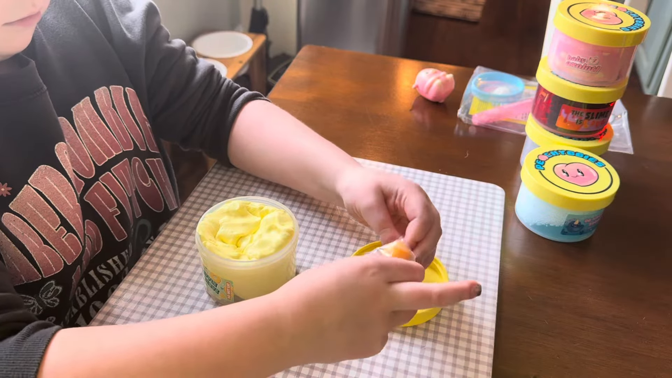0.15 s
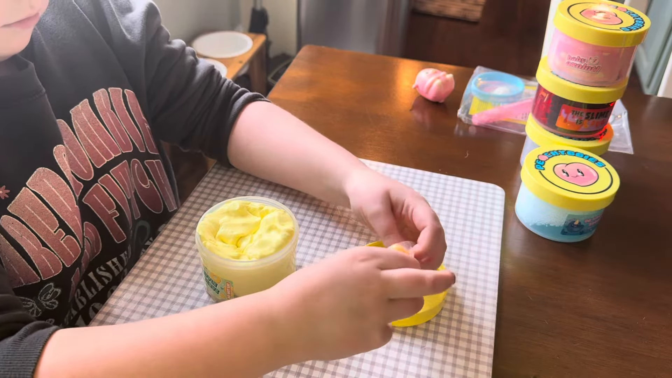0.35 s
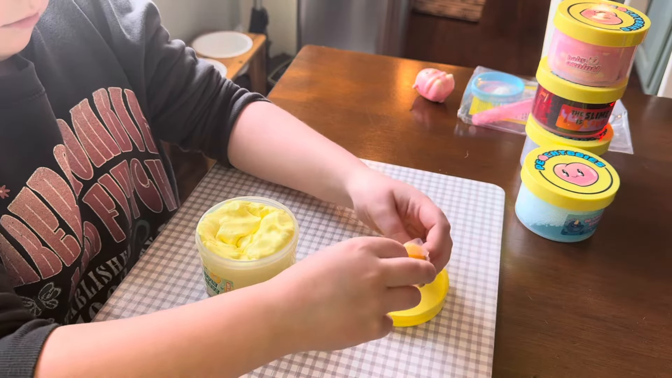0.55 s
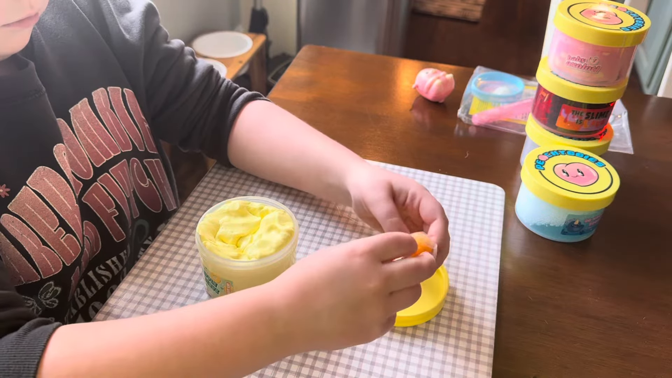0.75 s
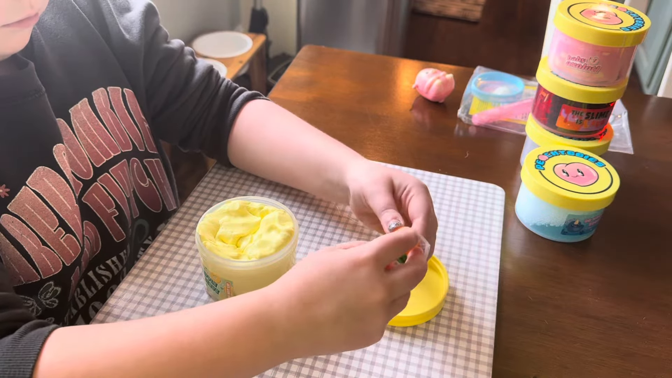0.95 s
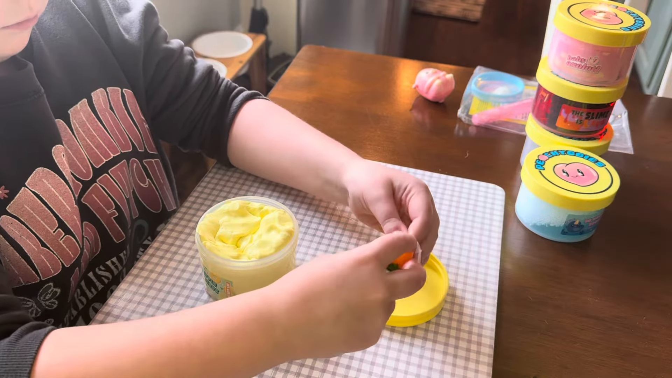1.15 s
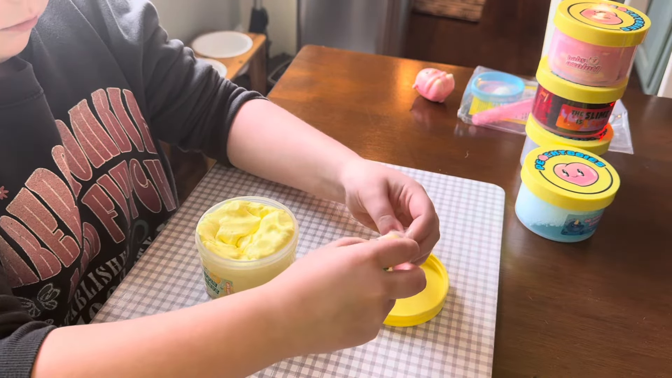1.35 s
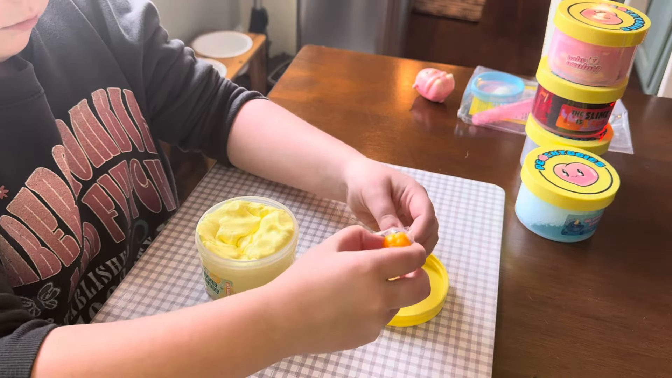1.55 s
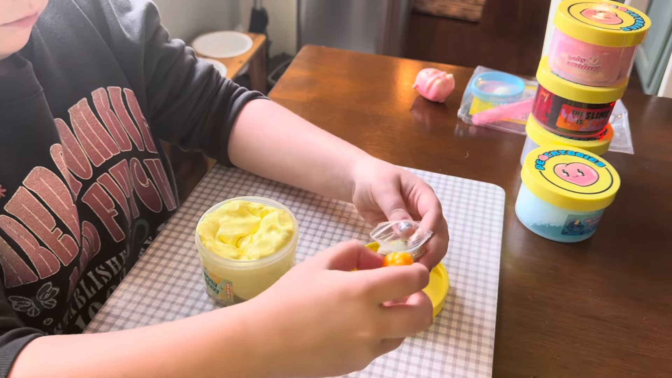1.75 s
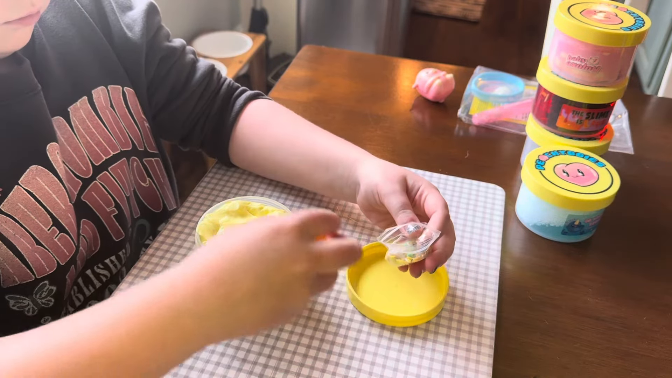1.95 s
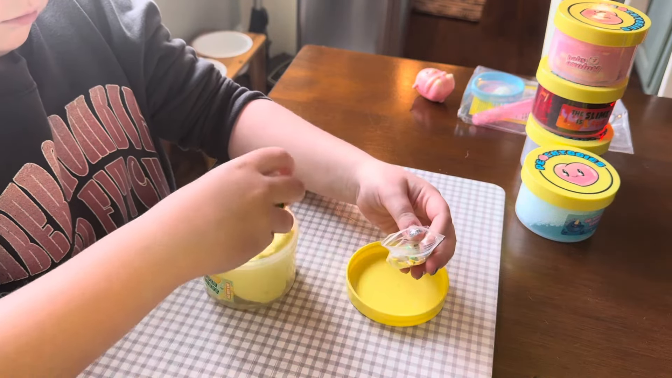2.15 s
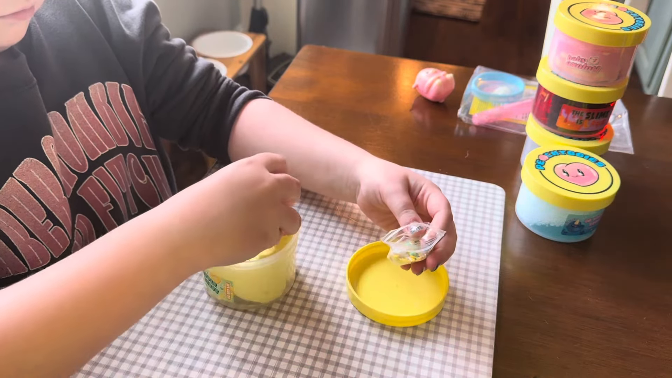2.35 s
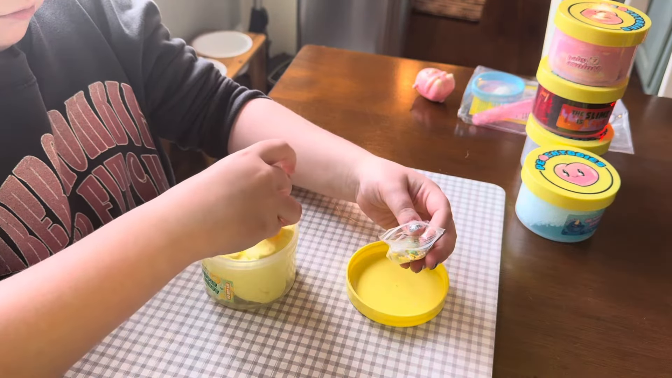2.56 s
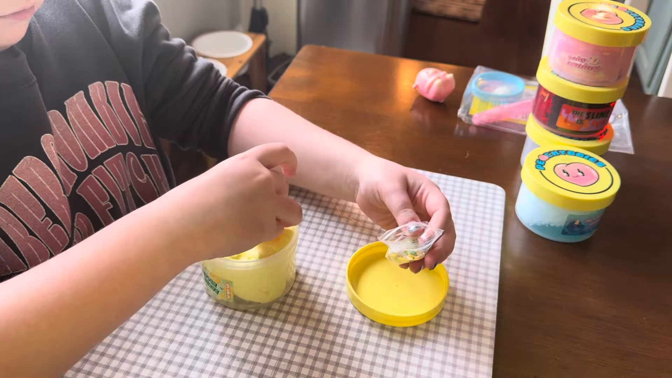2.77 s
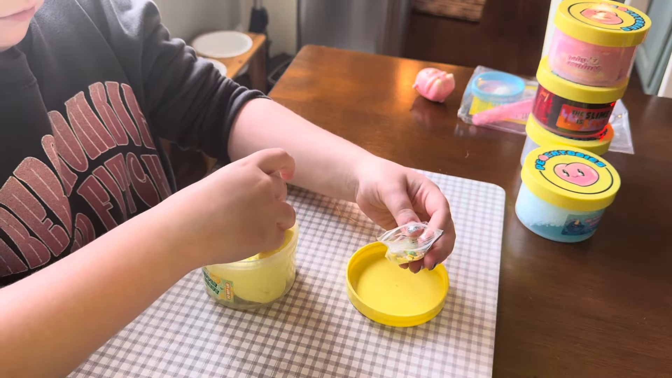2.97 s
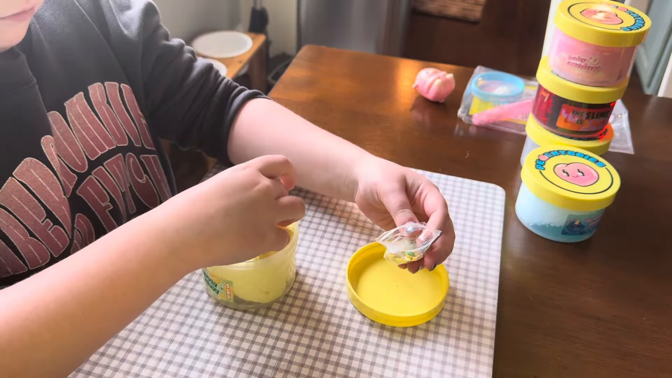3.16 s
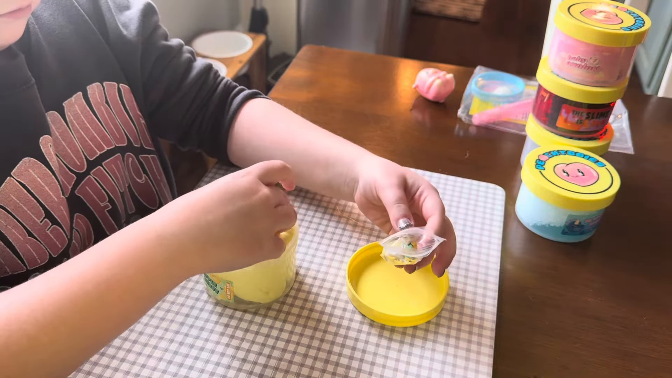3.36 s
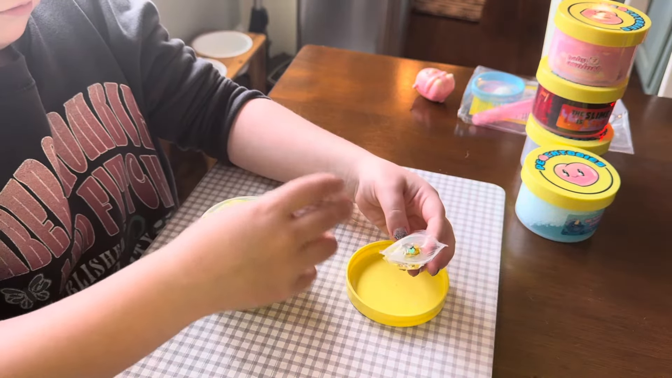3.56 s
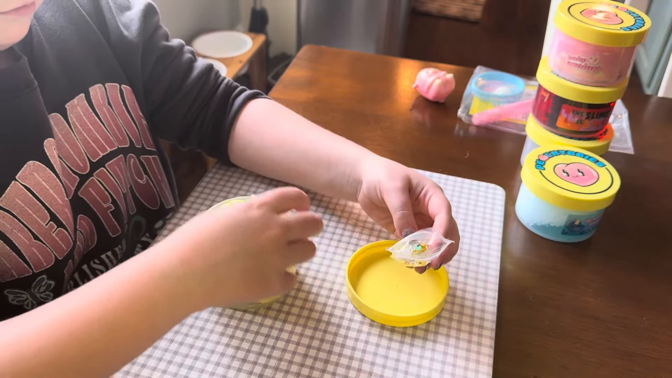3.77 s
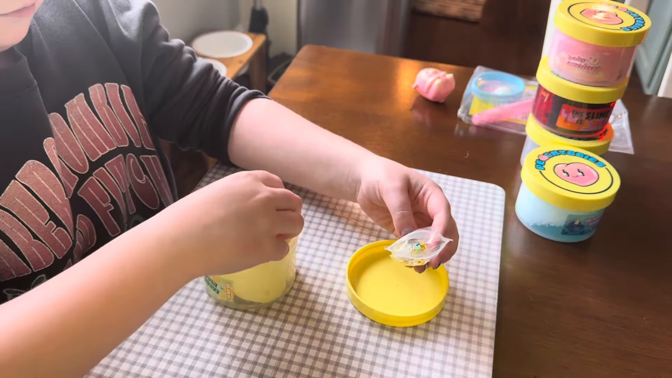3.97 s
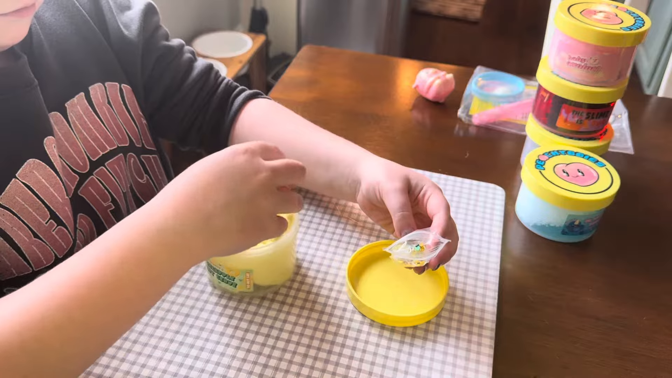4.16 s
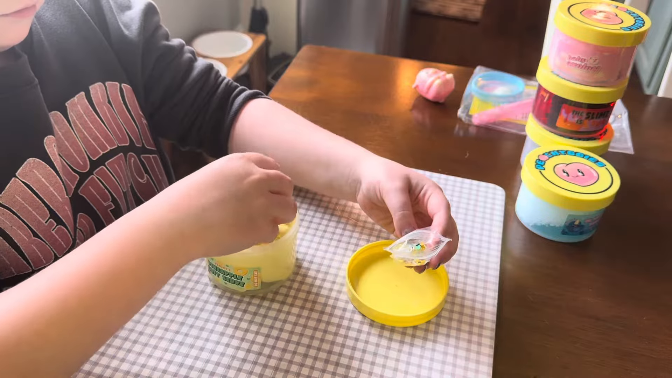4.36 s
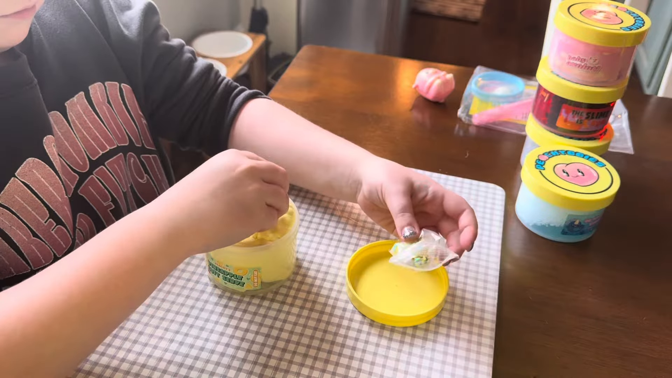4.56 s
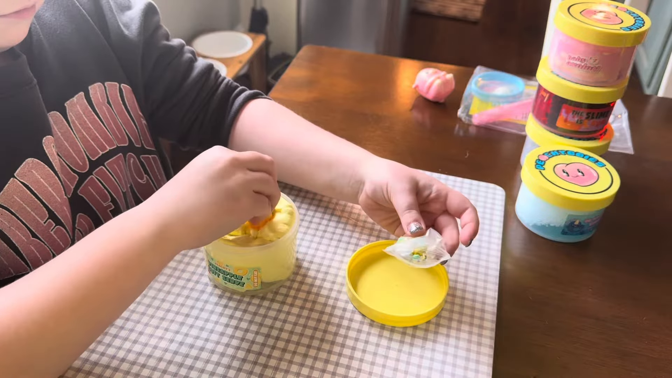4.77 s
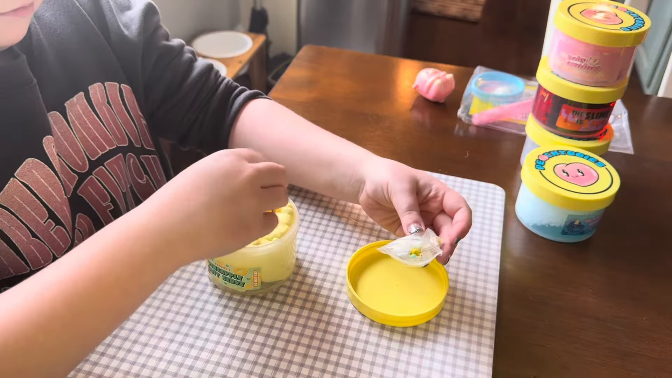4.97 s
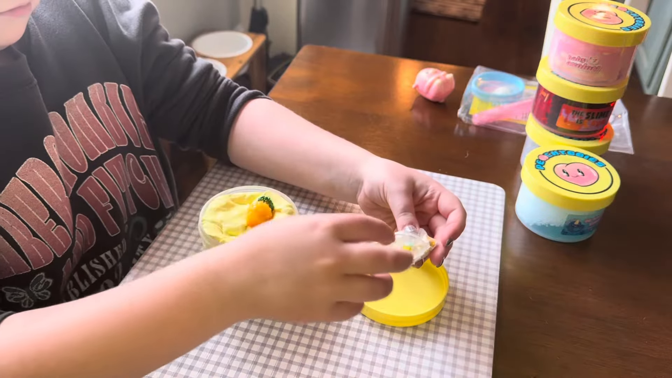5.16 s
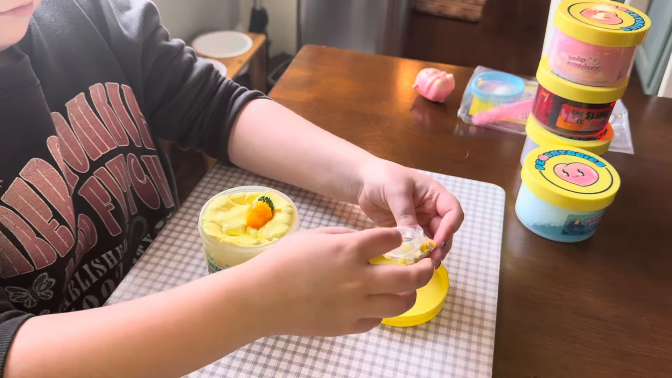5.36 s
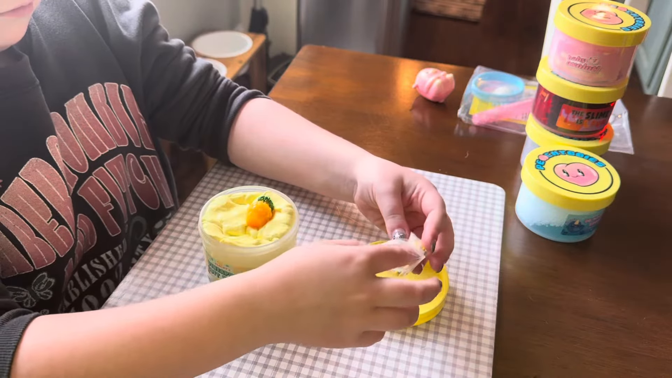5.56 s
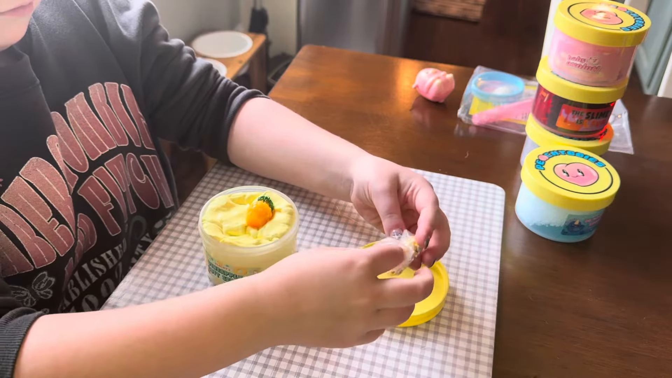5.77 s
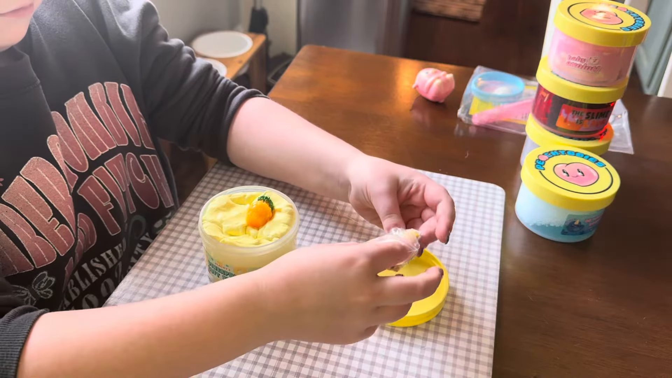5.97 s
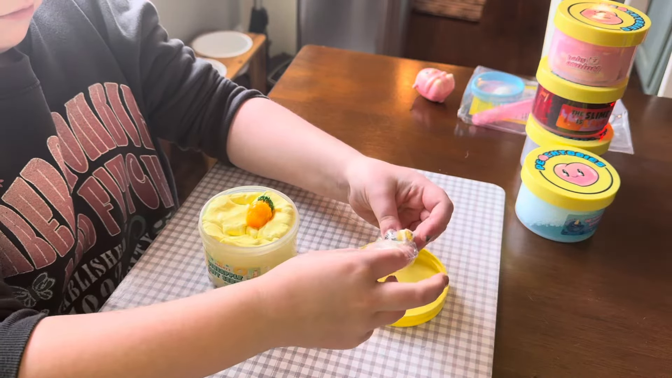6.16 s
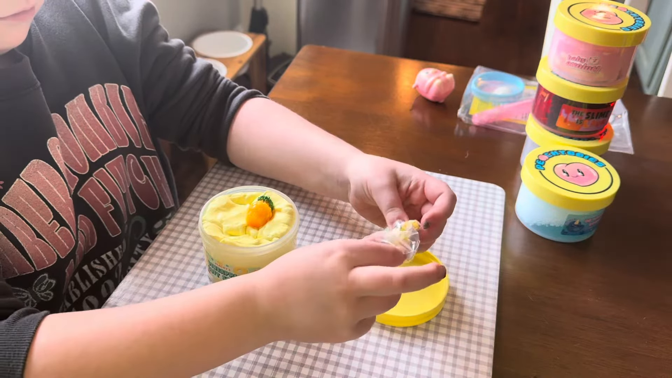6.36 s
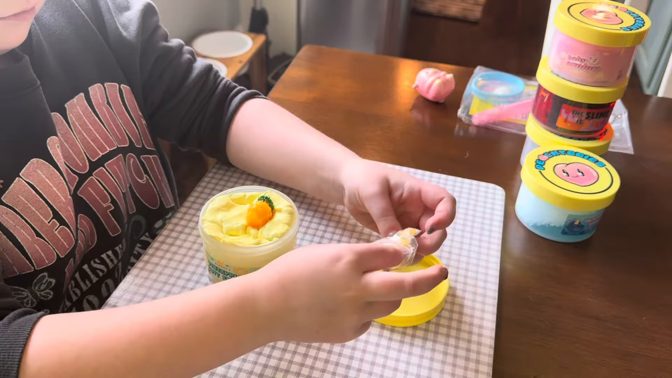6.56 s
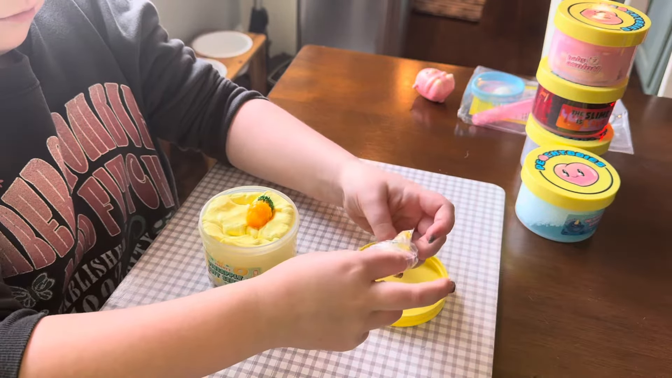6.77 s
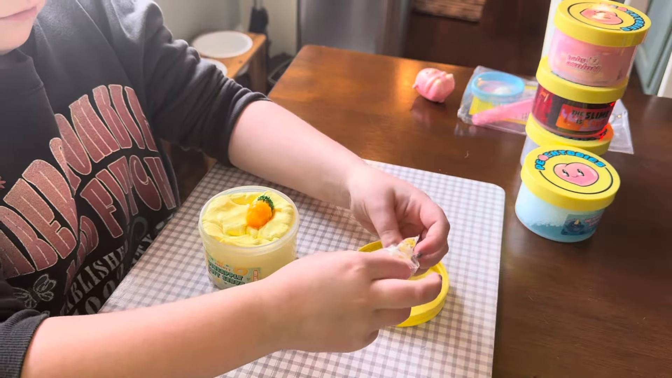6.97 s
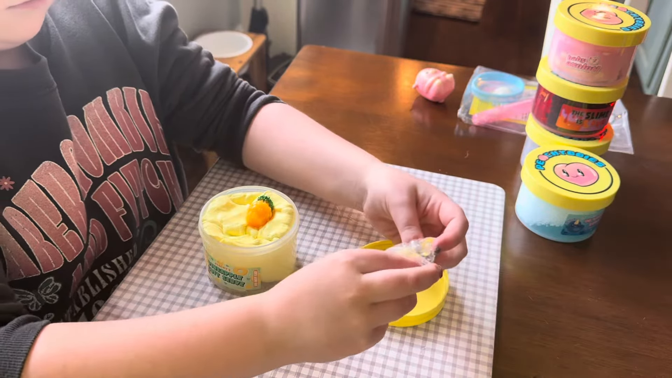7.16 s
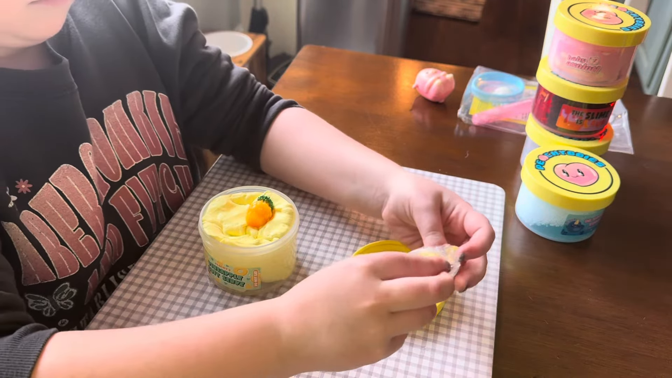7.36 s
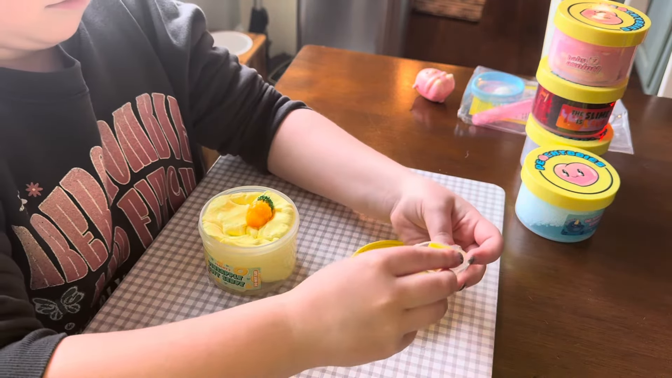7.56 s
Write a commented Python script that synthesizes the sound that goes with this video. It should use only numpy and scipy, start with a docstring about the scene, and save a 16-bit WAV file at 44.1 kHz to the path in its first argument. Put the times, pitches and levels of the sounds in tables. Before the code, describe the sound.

Small crisp plastic snaps and rustles in a lively room, dull floor thumps, a faint wet squish, a hollow tub clatter, then more crinkling.

```python
"""Charm, crinkly bag and slime tub

At a wooden table, fingers work a small charm out of a plastic bag, press it into a tub of slime and go back.
The film snaps (cracks and short rings), rustles (trains of tiny slips) and squeaks once (a falling chirp).
The slime squishes in dull pops; once the tub knocks on the table and rattles to rest (bursts and ringing modes).
Dull thumps, most like steps on a wooden floor, one the table's boom (low sines, dying noise), fill a lively room.
Beneath lie shaped room noise and a faint appliance hum (wavering sines)."""
import sys
import numpy as np
from scipy import signal
from scipy.fft import rfft, irfft
from scipy.io import wavfile
from scipy.ndimage import uniform_filter1d

SR = 44100
rng = np.random.default_rng(int(sys.argv[2]) if len(sys.argv) > 2 else 0)


def file_out(sig):
    """Save sig as 16-bit WAV at sys.argv[1]."""
    # one column per channel
    cols = np.atleast_2d(sig).T
    # limit, then scale
    lim = np.clip(cols, -1, 1)
    pcm = np.round(lim * 32767).astype(np.int16)
    wavfile.write(sys.argv[1], SR, pcm)


N = 336042


def gain_of(db):
    """Decibels to amplitude."""
    return 10 ** (np.asarray(db) / 20)


def evened(x):
    """Scales to rms 1."""
    return x / np.sqrt(np.mean(x ** 2) + 1e-20)


def sized(x, seconds):
    """Gives a sound the energy of rms 1 held for so many seconds."""
    return evened(x) * np.sqrt(seconds * SR / x.shape[1])


def read(points, hz):
    """Reads a table of (frequency [Hz], value) on a log-frequency axis."""
    f, value = np.transpose(points)
    return np.interp(np.log(hz + 1), np.log(f + 1), value)


def add(mix, s, sound):
    """Mixes a stereo sound in at time s."""
    part = mix[:, max(round(s * SR), 0):][:, :sound.shape[1]]
    part += sound[:, :part.shape[1]]


def colour(x, points):
    """Minimum-phase filter with the given (frequency [Hz], level [dB]) shape: it never sounds ahead of its cause."""
    size = 4096
    log_gain = np.log(gain_of(read(points, abs(np.fft.fftfreq(size, 1 / SR)))))
    taps = np.fft.ifft(np.exp(np.conj(signal.hilbert(log_gain)))).real[:size // 2]
    return signal.oaconvolve(x, taps[None], axes=1)[:, :x.shape[1]]


# likeness of the two ears in diffuse sound: (frequency [Hz], likeness [0 to 1])
EAR_LIKENESS = [(60, .995), (150, .95), (300, .9), (640, .5), (1400, .25), (3100, .1), (15000, 0)]


def diffuse(size):
    """Noise from all around: long bass waves reach both ears alike, short treble waves do not."""
    a, b = rfft(rng.standard_normal((2, size)))
    same = np.clip(read(EAR_LIKENESS, np.fft.rfftfreq(size, 1 / SR)), -1, 1)
    return irfft(np.array([a, same * a + np.sqrt(1 - same ** 2) * b]), size)


def burst(t, decay, apart):
    """A flat-spectrum burst that rises and dies within a few decay times; each ear has a share of treble to itself."""
    noise = rng.standard_normal((3, len(t)))
    shape = np.sqrt(t / decay) * np.exp(-t / decay)
    own_treble = noise[1:] - np.roll(noise[1:], 3, axis=1)
    spectrum = rfft((noise[0] + apart * own_treble) * shape)
    flat = irfft(spectrum / (abs(spectrum) + 1e-12), len(t))
    return flat * np.sqrt(shape)


# spectrum of the room noise: (frequency [Hz], relative level per hertz [dB])
AIR_COLOUR = [(15, -39.5), (25, -18.5), (59, -0.5), (149, -7), (180, -1), (206, -9), (256, -5),
              (476, -12.5), (516, -11.5), (560, -15.5), (695, -18.5), (1040, -30), (4740, -46),
              (6380, -43.5), (16000, -52.5)]
# tones of the appliance: (frequency [Hz], mean rms level [dB])
HUM_TONES = [(75.4, -75), (179.5, -72), (295.5, -76), (416.5, -80), (510.8, -74)]


def air(air_db=-61, hum_waver=0.21):
    """Steady shaped room noise and a faint hum whose tones each waver in level on their own."""
    t = np.arange(N) / SR
    knots = np.linspace(0, t[-1], num=40)
    hum = np.zeros(N)
    for hz, db in HUM_TONES:
        waver = 1 + hum_waver * np.interp(t, knots, rng.standard_normal(len(knots)))
        hum += gain_of(db) * np.sqrt(2) * waver * np.sin(2 * np.pi * hz * t)
    noise = irfft(rfft(diffuse(N)) * gain_of(read(AIR_COLOUR, np.fft.rfftfreq(N, 1 / SR))), N)
    return gain_of(air_db) * evened(noise) + hum


# strokes of the fingers on the film:
# (start [s], length [s], relative pressure [dB], relative crispness of fizz over rub [dB])
STROKE_LIST = [(0.01, 0.098, -72, 4.5), (0.273, 0.11, -71.5, 6), (0.523, 0.24, -71, -3),
               (0.727, 0.055, -61, -3), (0.785, 0.13, -60, -6), (0.95, 0.12, -60.5, 1),
               (1.184, 0.18, -67.5, -12), (1.448, 0.32, -70.5, -7), (1.665, 0.34, -73.5, -6.5),
               (2.089, 0.014, -57, -12), (2.262, 0.025, -69, -29.5), (3.256, 0.081, -92, 10),
               (4.052, 0.0051, -62, 1), (4.41, 0.041, -76, 3.5), (4.534, 0.16, -72.5, -10),
               (5.198, 0.19, -77.5, -2.5), (5.403, .04, -70, -1.5), (5.465, 0.044, -57, 0),
               (5.754, 0.034, -62.5, 3.5), (5.81, 0.24, -65, -2), (6.158, 0.11, -71, -5),
               (6.276, 0.019, -60, -5), (6.392, 0.058, -61, -4.5), (6.531, 0.068, -61.5, -1.5),
               (6.68, 0.44, -71.5, 0.5), (7.09, 0.067, -59, -5), (7.197, 0.13, -65.5, 1.5),
               (7.346, 0.02, -61.5, -5.5)]
# the fingers bear down quickly; the film then settles
STROKE_SWELL_DB_PER_S, STROKE_RELEASE_DB_PER_S = 605, 191.5


def strokes():
    """Levels of the crisp fizz and the soft rub: each stroke swells, holds and dies away."""
    t, crisp, soft = np.arange(N) / SR, np.zeros(N), np.zeros(N)
    for s, length, db, crispness in STROKE_LIST:
        near = slice(max(round((s - .5) * SR), 0), round((s + length + .5) * SR))
        before = np.maximum(s - t[near], 0)
        after = np.maximum(t[near] - s - length, 0)
        level = gain_of(db - STROKE_SWELL_DB_PER_S * before - STROKE_RELEASE_DB_PER_S * after)
        crisp[near] = np.maximum(crisp[near], level * gain_of(crispness))
        soft[near] = np.maximum(soft[near], level)
    return crisp, soft


def grains(per_s, spread_db, decay, clump_db, low_hz, high_hz, ring_db):
    """A train of tiny slips, louder in clumps, with sizes set by spread_db; each crease rings at its own pitch."""
    clumps = evened(uniform_filter1d(uniform_filter1d(rng.standard_normal(N), size=600), size=400))
    size_db = spread_db * np.minimum(rng.exponential(1, N), 4) + clump_db * np.tanh(clumps)
    size = gain_of(size_db) * (rng.random(N) < per_s / SR)
    pitches = np.geomspace(low_hz, high_hz, num=16)
    crease = rng.integers(0, len(pitches), N)
    t, out = np.arange(512) / SR, np.zeros((2, N))
    for k, hz in enumerate(pitches):
        ring = [(hz * 0.87, 0), (hz, ring_db), (hz * 1.18, 0)]
        grain = evened(colour(burst(t, decay, apart=0.98), ring))
        out += signal.oaconvolve((size * (crease == k))[None], grain, axes=1)[:, :N]
    return out


# film sliding on film: (frequency [Hz], relative level [dB])
FIZZ_COLOUR = [(1500, -23), (4000, -1.5), (7800, 1.5), (13000, -1.5), (15500, -4.5)]
# film crumpling under the fingertips: (frequency [Hz], relative level [dB])
RUB_COLOUR = [(200, 6.5), (700, 3.5), (1400, 4.5), (2000, -5), (2700, -4.5), (4000, -4.5), (8000, -34)]
# small creases giving way: (frequency [Hz], relative level [dB])
CRINKLE_COLOUR = [(400, -16.5), (1400, 4.5), (1950, 1.5), (2600, 10), (4500, 3.5), (8000, -20.5),
                  (14000, 1)]


def rustle(rub_db=-2, crinkle_db=-2):
    """Film slides on film (crisp) and crumples under fingertips (soft); where it does both, small creases give way."""
    crisp, soft = strokes()
    fizz = grains(per_s=2000, spread_db=0, decay=.00038, clump_db=3.5, low_hz=3970, high_hz=12700, ring_db=9.5)
    rub = grains(per_s=500, spread_db=2.5, decay=.0006, clump_db=3, low_hz=1000, high_hz=5000, ring_db=14)
    crinkle = grains(per_s=85, spread_db=2.2, decay=.0007, clump_db=2, low_hz=1000, high_hz=5000, ring_db=18)
    out = crisp * evened(colour(fizz, FIZZ_COLOUR))
    out += gain_of(rub_db) * soft * evened(colour(rub, RUB_COLOUR))
    out += gain_of(crinkle_db) * np.minimum(crisp, soft) * evened(colour(crinkle, CRINKLE_COLOUR))
    return out


def patch(t, hz, decay, below_db=-10, above_db=-9, overtone_db=-13):
    """A few cycles from a patch of film that flips: a burst narrowed around its pitch."""
    shape = [(hz / 5, -26), (hz * 0.6, below_db - 3), (hz * 0.85, below_db), (hz, 0),
             (hz * 1.16, above_db), (hz * 2, overtone_db), (hz * 4, -26)]
    return sized(colour(burst(t, decay, apart=0.27), shape), .001)


# snaps of the film:
# (time [s], relative strength [dB], ring pitch [Hz], relative sharpness of crack over ring [dB])
SNAP_LIST = [(0.0107, -47, 2730, 13.5), (0.066, -41.5, 2840, 3), (0.1109, -45, 2750, 9.5),
             (0.142, -40.5, 3000, 1), (0.286, -40, 915, -1), (0.2964, -33, 1070, -2),
             (0.304, -48, 1120, -8), (0.3192, -38.5, 1530, 8), (0.3725, -43, 1530, 13.5),
             (0.5314, -54, 1600, 18), (0.603, -51, 1310, 9), (0.633, -50.5, 3450, -3),
             (0.701, -46.5, 1120, -17), (0.737, -50, 2560, 7), (0.783, -56, 3000, -5),
             (0.7901, -39, 4460, 3), (0.7998, -44, 1430, 3), (0.803, -38.5, 2530, 3),
             (0.8224, -52, 2570, -11), (0.844, -33, 2550, 8), (0.852, -43, 2650, -8),
             (0.8614, -43, 2660, 4), (0.9011, -41.5, 1330, 11.5), (0.908, -45, 1280, 3),
             (0.931, -46.5, 4400, 0), (0.9581, -55, 1330, 25), (0.9837, -39.5, 2580, 15.5),
             (1.047, -40, 4900, 18), (1.0623, -39.5, 1270, -9), (1.1346, -45, 2730, 16.5),
             (1.239, -42, 1410, -8.5), (1.248, -48.5, 1440, -16), (1.28, -49, 2550, -15),
             (1.286, -49, 1460, -18), (1.3179, -41, 2900, -14), (1.5613, -40.5, 1630, -6),
             (1.654, -55.5, 2510, 19), (1.676, -47.5, 1050, -5), (1.765, -53.5, 2830, 3.5),
             (2.001, -38.5, 2260, -3), (2.002, -42, 3660, -20), (2.257, -60, 3030, -16),
             (2.442, -70.5, 2980, 8), (3.4503, -61, 2470, 1), (4.3517, -50, 7500, -6),
             (5.001, -41.5, 6050, 5), (5.003, -48.5, 4600, 1), (5.4615, -35.5, 3900, 18),
             (5.4682, -35.5, 3870, -17), (5.4843, -43, 3780, 1), (5.534, -39.5, 1070, 8.5),
             (5.6102, -47.5, 2680, -4), (5.6421, -42, 2660, 9), (5.821, -44, 1300, 5),
             (5.8357, -43.5, 2560, -6), (5.8428, -45, 3700, 11), (5.8603, -41, 3830, 14),
             (5.8841, -40, 3770, 12.5), (5.93, -42, 2230, 15), (6.022, -48, 2680, 12),
             (6.0938, -53.5, 2160, 23.5), (6.2336, -49, 2460, -3), (6.278, -40, 2570, -4),
             (6.286, -45.5, 2480, -12), (6.301, -44.5, 1090, -10), (6.335, -46, 2730, 17),
             (6.5369, -49, 2600, -4), (6.5567, -41.5, 1200, 1), (6.6216, -51.5, 1390, 10),
             (6.7839, -49.5, 1110, 8), (6.8049, -41.5, 2500, 7.5), (6.8125, -51, 1400, 0),
             (6.8495, -48, 2560, 17.5), (6.8945, -47, 3300, 9.5), (6.942, -42.5, 1210, 9.5),
             (6.9834, -43.5, 2970, 16), (7.064, -45, 2570, 3), (7.0935, -45, 2900, 14.5),
             (7.0962, -41, 1380, 8.5), (7.1002, -37.5, 3570, -5), (7.11, -48, 4200, -7),
             (7.149, -38, 1030, 4), (7.205, -48, 1100, -8), (7.2424, -46.5, 1250, 6), (7.287, -41, 820, -9),
             (7.421, -49, 920, -4), (7.5158, -49, 2630, 14), (7.5779, -53, 1610, 7.5)]
# a snap's crack: (frequency [Hz], relative level [dB])
CRACK_COLOUR = [(200, -25), (700, -0.5), (1500, -6.5), (3000, -7), (5500, -3), (7700, 5.5), (12000, 5.5),
                (16000, 5.5)]
CRACK_DECAY_S = 0.0006
EDGE_PER_SHARPNESS = 0.97  # a sharper crack reaches higher: dB of top treble per dB of sharpness
CREASE_COLOUR_DB = 3  # no two creases crack with quite the same colour
SLIP_DB_PER_SHARPNESS = 0.13  # a softer snap is a crease giving way in several steps
SLIP_HZ = 2100  # pulls the pitch of the creases that follow a snap


def snaps(ring_decay=0.0012, crack_db=-6, ring_db=-2.5, edge_db=-15,
          slip_db=-17.0, slip_gap=0.007, slip_fade_db=-7.0, count=3):
    """The film buckles: a bright crack and a short ring, then neighbouring creases follow, each at its own pitch."""
    out, t = np.zeros((2, N)), np.arange(1024) / SR
    bands = np.geomspace(1000, 16000, num=12)
    for s, db, hz, sharpness in SNAP_LIST:
        at = s + .0005
        edge = edge_db + EDGE_PER_SHARPNESS * sharpness
        crack = colour(burst(t, CRACK_DECAY_S, apart=.15), CRACK_COLOUR)
        crack = colour(crack, [(5000, 0.0058), (8500, 0.56 * edge), (11500, edge)])
        crack = colour(crack, np.c_[bands, CREASE_COLOUR_DB * rng.uniform(-1, 1, len(bands))])
        add(out, at, gain_of(db + crack_db + sharpness) * sized(crack, .001))
        add(out, at, gain_of(db + ring_db) * patch(t, hz, ring_decay))
        for k, (wait, octaves) in enumerate(rng.uniform(-1, 1, (count, 2))):
            at += slip_gap * 2 ** wait
            slip = patch(t, np.sqrt(hz * SLIP_HZ) * 2 ** octaves, ring_decay)
            level_db = db + slip_db + k * slip_fade_db - SLIP_DB_PER_SHARPNESS * sharpness
            add(out, at, gain_of(level_db) * slip)
    return out


# dull thumps of floor and table; the one at 4.134 s is the table booming under the knocking tub:
# (time [s], relative boom level [dB], boom pitch [Hz], thud level [dB], scuff level [dB])
THUMP_LIST = [(0.365, -39, 55, -47, -56.5), (1.003, -38.5, 71.3, -39.5, -57.5),
              (1.467, -39, 68.5, -38.5, -53), (2.083, -70, 73, -48.5, -56), (2.133, -62, 79.6, -43, -63),
              (3.354, -45, 72.4, -45.5, -67.5), (3.53, -51, 65.7, -56, -95), (4.134, -33, 51.5, -34, -41.5),
              (4.769, -33.5, 66.3, -38, -53.5), (4.857, -38.5, 61.7, -43.5, -59),
              (5.271, -40, 55, -48.5, -74), (5.389, -42.5, 57, -50, -74), (5.912, -46, 61, -39, -51.5),
              (6.391, -35.5, 65.9, -37, -49), (7.419, -30, 52.4, -52, -67)]
# dull body of a thump: (frequency [Hz], relative level [dB])
THUD_COLOUR = [(25, -15), (45, 22), (130, 8), (300, 5.5), (500, -7), (1000, -44.5)]
# brighter noise of a thump: (frequency [Hz], relative level [dB])
SCUFF_COLOUR = [(200, -26), (600, 10.5), (1500, -2), (3000, -4), (5000, -15.5), (9000, -51)]
BOOM_T60_S = 0.38  # every thump rings for the same time


def thumps(boom_trim_db=2.5, rise=0.017, thud_t60=0.48, scuff_t60=0.52, scuff_rise=0.0016):
    """Each thump booms as a dying sine; its thud and scuff arrive blurred by the room."""
    out, t = np.zeros((2, N)), np.arange(SR // 2) / SR
    swell = 1 - np.exp(-(t / rise) ** 2)
    for s, boom_db, hz, thud_db, scuff_db in THUMP_LIST:
        boom = gain_of(boom_db + boom_trim_db - 60 * t / BOOM_T60_S) * np.sin(2 * np.pi * hz * t)
        thud = gain_of(thud_db - 60 * t / thud_t60) * evened(colour(diffuse(len(t)), THUD_COLOUR))
        scuff = gain_of(scuff_db - 60 * t / scuff_t60) * evened(colour(diffuse(len(t)), SCUFF_COLOUR))
        add(out, s, swell * (boom + thud) + (1 - np.exp(-t / scuff_rise)) * scuff)
    return out


SQUEAK_S, SQUEAK_LENGTH_S, SQUEAK_DB = 1.188, 0.032, -60
SQUEAK_HZ, SQUEAK_SAG_HZ_PER_S, SQUEAK_JITTER_HZ = 2610, 6500, 220


def squeak():
    """A fingertip sticks and slips on the film: one tiny, rough, falling chirp."""
    out, t = np.zeros((2, N)), np.arange(0, SQUEAK_LENGTH_S, 1 / SR)
    jitter_hz = SQUEAK_JITTER_HZ * evened(uniform_filter1d(rng.standard_normal(len(t)), size=50))
    pitch_hz = SQUEAK_HZ + jitter_hz - SQUEAK_SAG_HZ_PER_S * t
    tone = np.sin(2 * np.pi * np.cumsum(pitch_hz) / SR)
    swell = np.sin(np.pi * t / SQUEAK_LENGTH_S)
    add(out, SQUEAK_S, np.ones((2, 1)) * gain_of(SQUEAK_DB) * swell * tone)
    return out


# a fingertip presses the charm into the slime: (start [s], length [s], relative level [dB])
PRESS_LIST = [(2.686, 0.45, -83), (3.23, 0.12, -73.5), (3.33, 0.075, -69.5), (3.433, 0.037, -65.5)]
# wet pops of the slime: (frequency [Hz], relative level [dB])
SQUISH_COLOUR = [(300, -16), (900, 8), (2700, -10), (3800, -16)]


def slime():
    """Tiny air pockets give way under the fingertip: a soft, dull squish that swells and fades with each press."""
    t, pressure = np.arange(N) / SR, np.zeros(N)
    for s, length, db in PRESS_LIST:
        pressure += gain_of(db) * np.sin(np.pi * np.clip((t - s) / length, 0, 1))
    pops = grains(per_s=500, spread_db=2, decay=.001, clump_db=2, low_hz=700, high_hz=2800, ring_db=14)
    return pressure * evened(colour(pops, SQUISH_COLOUR))


# the tub hits the table and rebounds ever faster:
# (time [s], relative clack level [dB], relative table boom level [dB], relative tick level [dB])
KNOCK_LIST = [(4.1089, -24.5, -21, -29.5), (4.153, -26, -45, -41), (4.1877, -27, -48, -39.5),
              (4.217, -27, -43, -51), (4.2405, -29, -31.5, -43.5), (4.258, -31.5, -39, -56)]
# modes of table and tub: (frequency [Hz], relative level [dB], t60 [s])
TABLE_MODES = [(115.4, -11, 0.31), (134.6, -1.5, 0.35), (202, 0.5, 0.14), (227.5, -7.5, 0.23),
               (279.7, -2.5, 0.14), (309, -1, 0.16), (356, -6, 0.045), (398, -3, 0.08), (584, -8.5, 0.11),
               (628, -11.5, 0.064), (702, -9.5, 0.13), (843, -11, .11), (945, -8, .1), (1084, -11, 0.075),
               (1347, -14, 0.2), (2112, -14, 0.087)]
# hollow body of a contact: (frequency [Hz], relative level [dB])
CLACK_COLOUR = [(40, -3), (70, 17), (150, -1), (260, 11), (500, 1), (1000, 1), (1500, -1.5), (1900, -8.5),
                (2700, -28), (4000, -30), (8000, -57), (14000, -43)]
# click of the hard rim: (frequency [Hz], relative level [dB])
TICK_COLOUR = [(500, -28), (2500, 15), (4500, -3), (7500, 3), (14000, -10.5)]
# chatter of the rim: (frequency [Hz], relative level [dB])
CHATTER_COLOUR = [(300, 2), (700, 13), (1300, 2), (1900, 0.5), (2600, 2), (3500, 0.5), (5000, -7),
                  (12000, -16)]
TICK_DECAY_S, CHATTER_DECAY_S = 0.0015, 0.0026
TABLE_TOP_HZ = 250  # modes below this follow the table boom level, the rest the clack level


def knocks(clack_decay=0.0013, rise_cycles=0.81, tub_db=-7, top_db=-3, hollow_db=-2, chatter_db=-14):
    """Each contact gives a tick, a hollow clack and a brief rim chatter, and rings the table top and the tub."""
    out, t = np.zeros((2, N)), np.arange(SR // 2) / SR
    for s, clack_db, boom_db, tick_db in KNOCK_LIST:
        clack = sized(colour(burst(t, clack_decay, apart=1.1), CLACK_COLOUR), .005)
        tick = sized(colour(burst(t, TICK_DECAY_S, apart=.4), TICK_COLOUR), .002)
        chatter = sized(colour(burst(t, CHATTER_DECAY_S, apart=1.2), CHATTER_COLOUR), .005)
        add(out, s, gain_of(clack_db + hollow_db) * clack)
        add(out, s, gain_of(tick_db) * tick)
        add(out, s, gain_of(clack_db + chatter_db) * chatter)
        for hz, db, t60 in TABLE_MODES:
            # only heavy blows move the low modes of the table top
            blow_db = boom_db + top_db if hz < TABLE_TOP_HZ else clack_db + tub_db
            # short waves reach the two ears out of step
            phase = hz / 1500 * rng.uniform(-1, 1, (2, 1))
            ring = gain_of(blow_db + db - 60 * t / t60) * (1 - np.exp(-t * hz / rise_cycles))
            add(out, s, ring * np.sin(2 * np.pi * hz * t + phase))
    return out


# decay of the reverberation: (frequency [Hz], t60 [s])
ROOM_T60 = [(60, 1), (250, 0.5), (700, 0.55), (1800, 0.64), (4800, 0.62), (9000, 0.39), (15000, 0.26)]
# colour of the reverberation: (frequency [Hz], relative level [dB])
WALL_COLOUR = [(60, -7), (200, -4), (600, 0), (2000, 1), (6000, -1), (13500, -3), (15000, -13)]
# nearby surfaces: (delay [s], level [dB])
CLOSE_ECHOES = [(.0077, -11.5), (0.018, -28), (0.026, -34)]
# direct sound at the two microphone ports: (frequency [Hz], lead of the left [radians])
LEFT_LEAD = [(0, -1), (1200, 0.5), (2400, -0.7), (3300, -1), (4400, -1.27), (5600, -2), (7000, 0.54),
             (8200, -0.63), (9300, 4.5), (16500, 8.5)]


def room(x, wet_db, onset=0.0014):
    """Direct sound at the two ports, a few close echoes and a diffuse tail that dies at its own rate in each band."""
    hz, t, z = signal.stft(diffuse(SR * 3 // 4), SR, nperseg=256)
    decay = gain_of(-60 * t / read(ROOM_T60, hz)[:, None])
    tail = signal.istft(z * decay, SR, nperseg=256)[1]
    tail *= 1 - np.exp(-(np.arange(tail.shape[1]) / SR / onset) ** 2)
    tail = colour(tail * gain_of(wet_db) / np.linalg.norm(tail[0]), WALL_COLOUR)
    for s, db in CLOSE_ECHOES:
        for ear in tail:
            ear[round((s + rng.uniform(0, .0004)) * SR)] += gain_of(db)
    turn = np.exp(-1j * read(LEFT_LEAD, np.fft.rfftfreq(N, 1 / SR)))
    direct = np.array([x[0], irfft(rfft(x[1]) * turn, N)])
    return direct + signal.fftconvolve(x, tail, axes=1)[:, :N]


TUB_LEAN_DB = 1.2  # the tub stands a little left of the bag


def scene():
    """The bag and the tub sound in the same room, over thumps and air."""
    bag = room(snaps() + squeak() + rustle(), wet_db=-6.0)
    tub = room(knocks() + slime(), wet_db=-5.5) * gain_of([[TUB_LEAN_DB], [-TUB_LEAN_DB]])
    return bag + tub + thumps() + air()


# balance of the two channels: (frequency [Hz], left over right [dB])
LEFT_OVER_RIGHT = [(60, 1.5), (130, -6.5), (290, -2.5), (640, -3), (1410, -1.5), (3100, -3.5), (6820, -2.5),
                   (15000, 0.5)]
# the microphone's uneven treble: (frequency [Hz], relative level [dB])
PORT_RESPONSE = [(30, -2), (5000, 2.5), (8300, 3), (9100, -2), (9800, -20), (10800, 4), (13300, 2.5),
                 (14900, -7), (15800, -3)]
EDGE_HZ = 16650  # upper band limit


def record(dry):
    """The sound leans mostly a little to the right; then the microphone's uneven treble and the band limit."""
    lean = read(LEFT_OVER_RIGHT, np.fft.rfftfreq(N, 1 / SR)) / 2
    leaning = irfft(rfft(dry) * gain_of([lean, -lean]), N)
    heard = colour(leaning, PORT_RESPONSE)
    low_pass = signal.firwin(511, EDGE_HZ, window=("kaiser", 9), fs=SR)
    return signal.oaconvolve(heard, low_pass[None], "same")


dry = scene()
out = record(dry)
file_out(out)
```